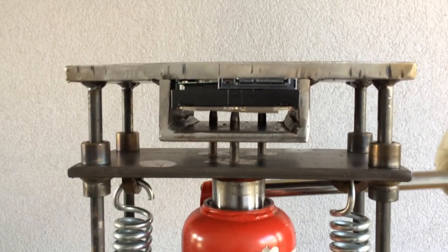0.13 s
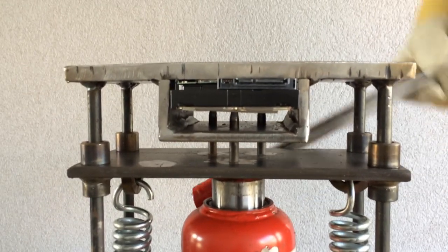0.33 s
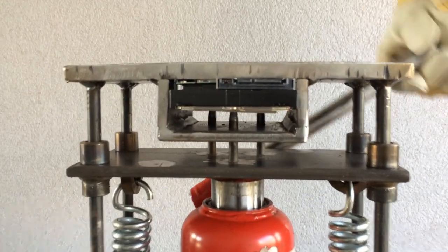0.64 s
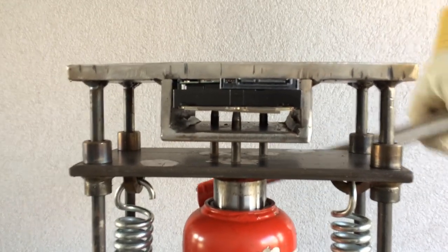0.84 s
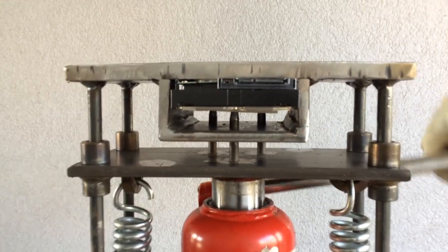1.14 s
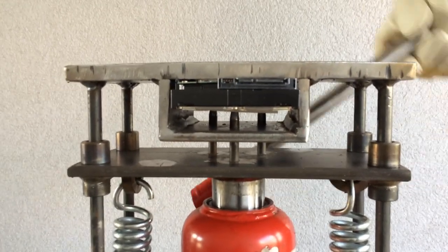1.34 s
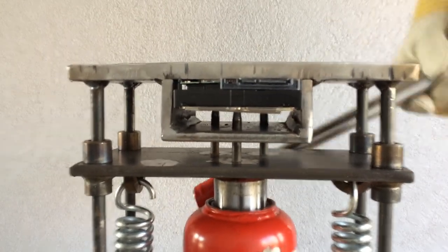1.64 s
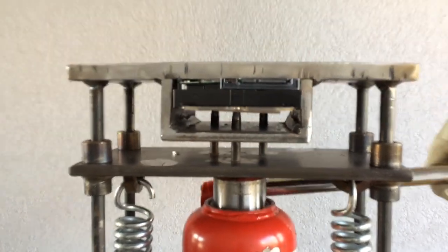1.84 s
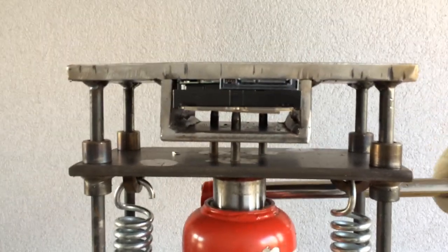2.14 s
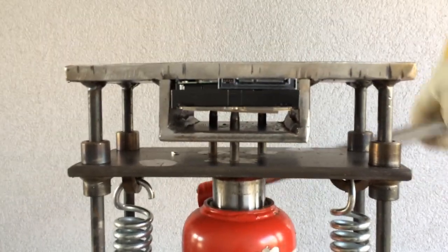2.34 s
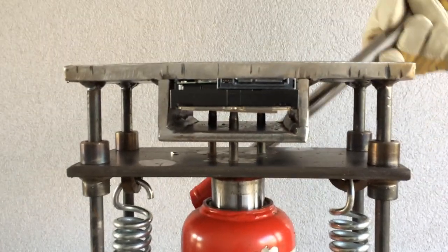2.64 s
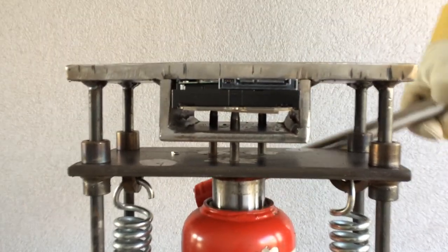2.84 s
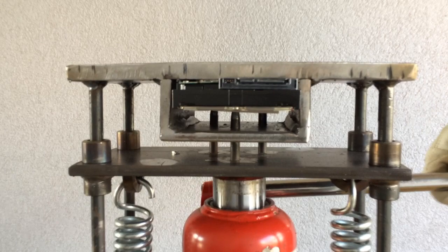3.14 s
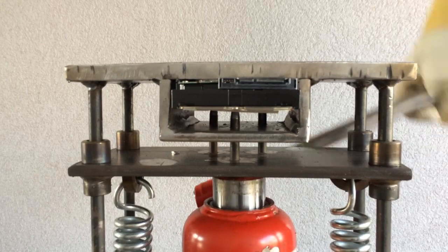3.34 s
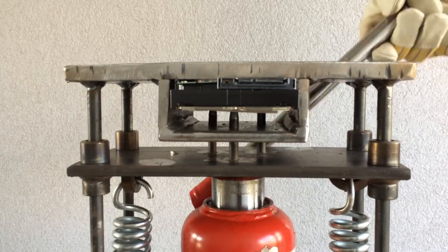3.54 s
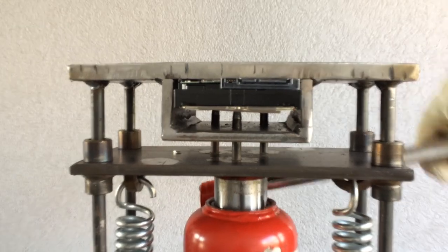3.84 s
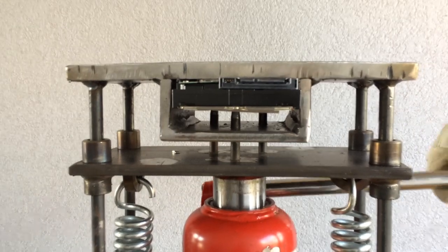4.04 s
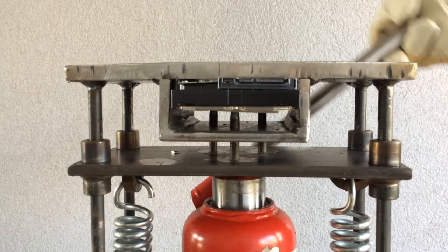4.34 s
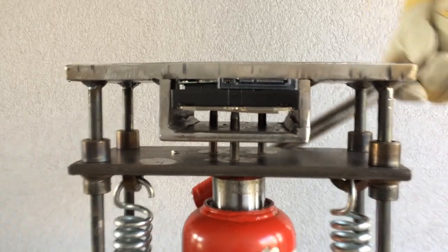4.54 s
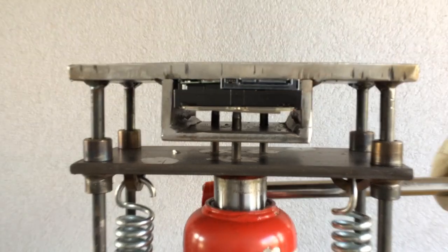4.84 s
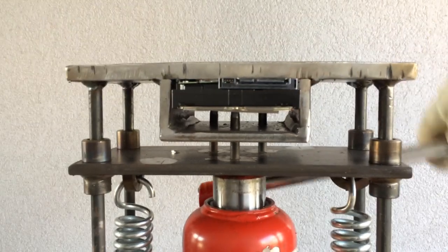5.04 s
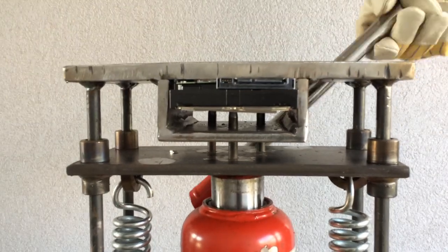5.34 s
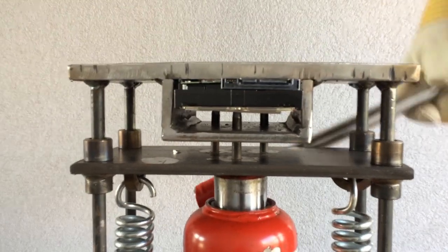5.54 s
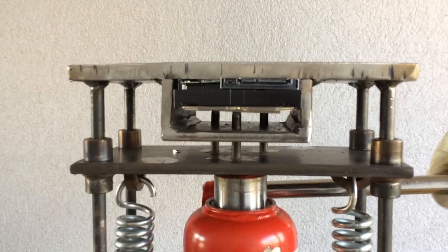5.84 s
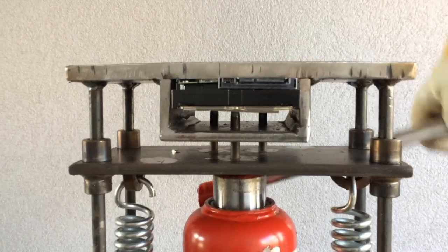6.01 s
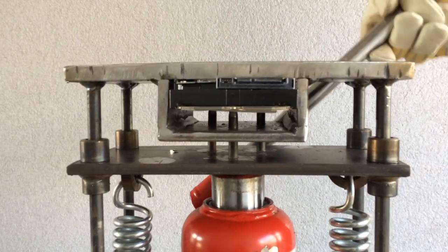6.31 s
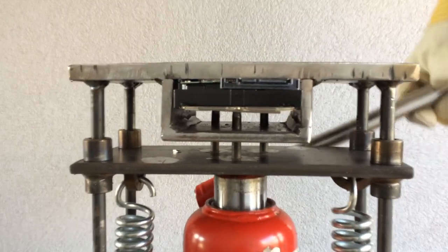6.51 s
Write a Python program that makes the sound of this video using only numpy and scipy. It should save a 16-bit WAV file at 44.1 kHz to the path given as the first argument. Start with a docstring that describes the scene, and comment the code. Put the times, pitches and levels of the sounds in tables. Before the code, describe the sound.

A bottle jack in a steel frame is pumped by hand, heard close up in a bare workshop with short, bright reverberation. Faint room hiss and soft low puffs of moving air run throughout. From 0.1 s dry metallic clicks start, with a light handle knock and a tiny high ping, thickening into a gritty cluster around 0.7 s. Sparser clicks follow at 1.2 s, then a dense group at 1.6 s. At 1.77 s a brief creak leads to a very loud, hard clack, its plates ringing over a noisy tail. Clicking strokes return around 2.4, 2.8, 3.3 and 3.7 s, with faint ticks and soft knocks between. A busy rattle at 4.6 s precedes a second loud clack at 4.93 s, with a stronger low thump and similar ringing. Further click clusters come near 5.5 s, a knock at 5.85 s, and last clicks around 6.5 s.

```python
"""Steel clicks over faint room hiss and low wobbling air: a bottle jack in a press frame is pumped by hand.
The slack pins of the handle linkage make the clicks, as gritty bursts that ring the steel modes.
Faint ticks, knocks on the handle's lower stop and small pin pings join in.
Twice the load slips with a loud clack: a creak, a snap with a rebound, then ringing plates.
The bare workshop answers clicks and clacks with noise tails that die band by band."""
import sys
import numpy as np
from scipy import signal
from scipy.fft import rfft, irfft
from scipy.io import wavfile
from scipy.ndimage import uniform_filter1d

SR = 44100
rng = np.random.default_rng(int(sys.argv[2]) if len(sys.argv) > 2 else 0)


def wav_record(signal):
    """Record a signal, one row per channel, as 16-bit PCM in the file named by sys.argv[1]."""
    frames = np.transpose(np.atleast_2d(signal))
    bounded = np.clip(frames, -1, 1)
    # unit amplitude maps onto the largest positive 16-bit level
    quanta = np.round(bounded * 32767).astype(np.int16)
    wavfile.write(sys.argv[1], SR, quanta)


N = 294147

# contacts of the handle linkage: (time [s], relative level [dB], weight: how far the heavy parts answer [dB],
# hardness: how far the edge bites [dB], decay time constant [ms])
CLICKS = [(0.002, -49.5, 8, 2.5, 0.89), (0.1348, -33, -8, -25, 9), (0.2764, -37, -19, -12, 9.7),
          (0.2844, -33, -24, -5, 11), (0.3081, -30.5, -15.5, -2.5, 4.6), (0.3985, -23.5, -22.5, -11.5, 6.8),
          (0.4982, -40, -41, -17, 5.5), (0.6787, -19.5, -29, -14, 1.8), (0.6827, -29.5, -21, 1, 2.3),
          (0.6937, -20, -21, -13.5, 4.3), (0.7193, -33, -9, 4.5, 5.5), (0.7388, -30.5, -0.5, -26, 8.5),
          (0.757, -39, -16, -24, 5.5), (0.8096, -36, -4.5, -45, 16), (0.9884, -57, -24, 6, 7.7),
          (1.2249, -38.5, -18, -1, 16), (1.2471, -28, -21.5, -3, 4.4), (1.314, -29, -20.5, -4, 4.4),
          (1.4362, -38, -45, -13, 5.8), (1.5878, -22, -14, -18, 7.9), (1.6256, -23, -23, -20, 5.9),
          (1.638, -27.5, -18, -20, 4.2), (1.6422, -24, -24, -19, 4.6), (1.6582, -38, -18, -1, 4.1),
          (1.6646, -29, -23, 2, 3.5), (1.668, -21.5, -20, -11, 4.2), (1.679, -22.5, -15, -10, 4.4),
          (1.6884, -35.5, 6, -15, 8.2), (1.8703, -20, -8.5, -2, 9), (1.8912, -20, -9.5, -8.5, 6.6),
          (2.3612, -34.5, -16, -9.5, 5.5), (2.367, -34, -20, -1, 6.9), (2.3842, -23.5, -20.5, 2.5, 3),
          (2.4087, -19.5, -25, -6, 10.5), (2.5939, -31, -12, -24, 9.4), (2.7617, -22, -33, -26, 4.8),
          (2.7751, -21.5, -23, -8.5, 6.8), (2.7904, -32.5, -22, -4, 7.9), (2.8095, -25.5, -16, -3.5, 9.3),
          (2.8264, -31, -0.5, -26, 6.8), (2.8708, -45, 8, -25, 7.2), (3.0846, -65.5, -9.5, 5.5, 5.5),
          (3.1407, -33.5, -8, -22, 7.2), (3.1804, -54, -5, -2, 5.5), (3.303, -24.5, -21.5, -9, 7.8),
          (3.3098, -35, -14, -3, 4.5), (3.3276, -33, -14.5, -3.5, 15), (3.366, -40, -21, -19, 6.4),
          (3.5378, -41, -19, -20, 5.7), (3.6503, -22.5, -14, -29.5, 5.2), (3.693, -20, -27, -11.5, 8.9),
          (3.7024, -31, -16, 6, 3.7), (3.7251, -32, -10, -12, 5.5), (3.7329, -29, -13, 1.5, 4.3),
          (3.7434, -21, -15.5, -24, 2), (3.7464, -27, -2.5, -18, 3.3), (3.802, -35, 2, -36, 4.2),
          (3.9307, -60, 2.5, -2, 5.5), (3.9604, -55.5, 1.5, -7, 4.8), (4.0446, -41, -4, -24, 9.7),
          (4.1904, -32, -14.5, -27, 6.7), (4.198, -32, -21, -9, 12), (4.2174, -32.5, -18, -2, 7.7),
          (4.225, -32.5, -16, -10, 5.5), (4.2489, -25.5, -26, -10, 10), (4.4079, -42.5, -19.5, -24.5, 5.5),
          (4.579, -21.5, -26, -17.5, 4.9), (4.587, -17, -26, -8.5, 7.8), (4.6082, -28, -23, -10, 4.3),
          (4.6168, -20, -22, -3.5, 3.9), (4.6265, -18.5, -29, -11.5, 6.4), (4.6327, -28.5, -1, -13, 5.8),
          (4.6787, -32.5, -5.5, -31, 10), (4.862, -55, -13, 3, 5.5), (5.1, -33.5, -18, -6, 5),
          (5.1266, -29.5, -19, -1.5, 1.9), (5.3122, -41, 0.5, -27, 4), (5.474, -26, -14, -23, 2.8),
          (5.5196, -19.5, -28, -17, 3.2), (5.525, -24.5, -20.5, -4, 12), (5.5593, -19, -25.5, -10, 6),
          (5.5683, -21, -14.5, -12, 2.4), (5.5777, -31, 2, -15, 5.3), (5.7635, -49.5, -1, -12, 5.5),
          (5.845, -31, -7.5, -18.5, 7.7), (6.0191, -36.5, -17, -12, 7), (6.0274, -36, -16, -0.5, 16),
          (6.056, -34, -13.5, -7, 4.1), (6.111, -40.5, -15.5, -20, 7.9), (6.2734, -42, -18.5, -20, 8),
          (6.4125, -26.5, -13, -35.5, 5.8), (6.4522, -18, -30.5, -9.5, 8.1),
          (6.486, -22.5, -11.5, -13.5, 5.5), (6.5044, -29, 0, -23, 2.6), (6.5557, -35, -4.5, -44, 11)]
# centres of the contact bands: (frequency [Hz])
BAND_HZ = [650, 1450, 3100, 5300, 9500, 15200]
# limits of the directly heard grit in those bands: (low [Hz], high [Hz])
BAND_EDGES_HZ = [(400, 1000), (1000, 2200), (2200, 4200), (4200, 7000), (7000, 14500), (15300, 15800)]
# colour of a contact in each band: (relative level [dB], share of its weight [ratio], share of its hardness [ratio])
CONTACT = [(-5.5, 0.92, 0), (4, 1.035, 0.011), (-9, 0.03, 0.039), (-9.5, 0, 0.12), (-6, 0.14, 1.15),
           (-13, 0.14, 1.3)]
# modes of handle, pins and frame: (frequency [Hz], width [Hz], relative level [dB])
STEEL_MODES = [(688, 120, 1.5), (925, 32, 2), (1168, 70, -1), (1450, 12, -8), (1600, 40, 0.5),
               (1930, 26, -3), (2357, 380, -8), (2550, 90, -15.5), (2920, 130, -4), (3173, 200, 0.5),
               (3320, 9, 1), (3654, 40, -1), (4760, 70, -8), (5080, 49, 1), (5350, 170, -3.5),
               (5820, 49, -9.5), (7625, 440, 0.5), (8390, 260, -2.5), (9180, 130, 0.5), (9800, 110, -2.5),
               (12300, 90, -0.5), (13800, 100, -5), (15520, 130, 8)]
# decay of the workshop: (frequency [Hz], time to fall 60 dB [s])
ROOM_T60 = [(150, 0.63), (300, 0.34), (700, 0.72), (1840, 0.73), (4850, 0.46), (9000, 0.31), (15000, 0.2)]
# colour of the room's answer to the clicks: (frequency [Hz], relative level [dB])
ROOM_COLOUR = [(150, -9.5), (250, -3), (400, 6.5), (700, 5), (1000, 3), (1600, -1), (2500, -0.5), (6000, 0),
               (15000, 1)]
# restless draught on the microphone, rising and falling: (time [s], relative level [dB])
DRAUGHT = [(0.0, -69), (0.76, -48), (1.09, -74.5), (1.99, -57), (3.59, -72), (3.84, -60), (4.66, -72.5),
           (4.83, -54.5), (5.14, -80.5), (5.72, -62), (6.41, -70.5), (6.67, -57)]
# puffs of air on the microphone: (centre time [s], relative level [dB], time to fall 20 dB either side [ms])
PUFFS = [(.024, -52.5, 60), (.30, -45, 82), (.43, -51, 60), (0.564, -39.5, 69), (.696, -46, 47),
         (0.86, -33.5, 42), (0.953, -43, 59), (1.618, -53, 62), (1.745, -45, 43), (1.87, -51, 144),
         (2.07, -45, 81), (2.274, -42, 81.5), (2.452, -43.5, 41.5), (2.68, -49, 73.5), (2.87, -49.5, 68),
         (2.99, -51.5, 84.5), (3.67, -63.5, 60.5), (3.79, -50.5, 122), (4.25, -53, 83.5),
         (4.374, -40, 51.5), (4.67, -44.5, 50.5), (4.89, -60, 85), (5.632, -47, 48), (5.757, -56, 86.5),
         (6.575, -47, 73)]
# spectrum of the air wobble: (frequency [Hz], relative level per Hz [dB])
AIR_TONE = [(15, -44.5), (25, -25), (54, 5), (99, 2), (188, -7), (236, -24), (300, -23.5), (390, -49),
            (660, -120)]
# spectrum of the room hiss: (frequency [Hz], relative level per Hz [dB])
HISS_TONE = [(88, -35), (150, -6.5), (255, -11), (356, 10), (560, -14.5), (682, 6.5), (798, -43),
             (934, -19.5), (2920, -8), (15300, -20.5), (16500, -35)]
# faint ticks under load: (time [s], average rate [ticks per s])
STRAIN = [(0, 40), (.12, 0), (.8, 0), (.9, 30), (1.1, 0), (3.0, 0), (3.1, 30), (3.25, 0), (3.85, 0),
          (3.95, 50), (4.1, 0), (6.67, 0)]
# the handle meets its lower stop: (time [s], relative level [dB])
KNOCKS = [(0.1347, -36), (2.5906, -40), (3.143, -37), (4.044, -46), (5.8475, -31.5)]
# modes of that stop: (frequency [Hz], relative level [dB], time to fall 60 dB [s])
STOP_MODES = [(1373, 1.5, 0.13), (1460, 4.5, 0.053), (1467, -4.5, 0.3), (1555, -9.5, 0.093)]
# a small pin is struck as the handle lifts: (time [s], relative level [dB])
PINGS = [(0.2836, -39.5), (1.2276, -41.5), (2.368, -36.5), (3.312, -44.5), (4.1993, -47), (6.03, -39)]
# modes of that pin: (frequency [Hz], relative level [dB], time to fall 60 dB [s])
PIN_MODES = [(9900, 0.5, 0.12), (12200, -3, .08), (15500, 4, 0.084)]
# the load slips: (time [s], relative level [dB], room level [dB], creak level [dB],
# air push before the bass cut [full scale = 1], bench thump level [dB])
CLACKS = [(1.765, -2.5, -20.5, -44.5, -0.093, -32.5), (4.9267, -4, -21.5, -49.5, 0.13, -15.5)]
# spectrum of the clack's grit: (frequency [Hz], relative level per Hz [dB])
CLACK_TONE = [(88, -49), (150, 2), (478, -8), (681, -14), (1280, -17.5), (1550, -11), (1780, 0.5),
              (2860, -1), (5350, -7), (8920, -7), (15200, -16), (16400, -16)]
# first instant of a clack: (frequency [Hz], relative level [dB], time to fall 60 dB [s])
SNAP_MODES = [(774, -7.5, 0.0082), (1530, -17, 0.013), (2290, 1, .012), (2960, -5.5, 0.0021),
              (4730, -8, .01), (8800, -13.5, .008)]
# thump of the bench: (frequency [Hz], relative level [dB], time to fall 60 dB [s])
BENCH_MODES = [(65, -3.5, 0.056), (141, 2.5, 0.022)]
# long rings of the press plates: (frequency [Hz], relative level [dB], time to fall 60 dB [s])
PLATE_MODES = [(670, -3.5, 1.3), (738, -6.5, 0.71), (918, -15.5, 2.9), (986, -4, 1.5), (1177, -4.5, 0.51),
               (1226, -5, 1.1), (1235, -15.5, 0.68), (1422, -6.5, 2.1), (1580, -11, 1.9), (1500, -4, 1.1),
               (1950, -2.5, .7), (1840, -7.5, 0.36), (2420, -8, .5), (2370, -8.5, .6)]
# colour of the room's answer to a clack: (frequency [Hz], relative level per third octave [dB])
CLACK_TAIL = [(150, -36.5), (300, -25.5), (500, -13.5), (700, -13), (1100, -6.5), (1600, -6.5), (2300, -5),
              (3500, -10), (6000, -10), (10000, -12.5), (15000, -27)]
# the load lands again: (delay [s], spread [s], swell above the tail [dB], upper limit of the swell [Hz])
SETTLE = (.039, .007, 5.5, 4000)

ROOM_STEP = 20  # samples per step of the room's decay
MODE_SHIFT = 9973  # samples between the slow wanderings of neighbouring modes


def amp(db):
    """Turn decibels into gain."""
    return 10 ** (np.asarray(db) / 20)


def rms_one(x):
    """Scale to rms 1."""
    return x / np.sqrt(np.mean(x ** 2) + 1e-20)


def at_hz(points, hz):
    """Read a (frequency, value) table on a log-frequency axis."""
    table_hz, values = np.transpose(points)
    return np.interp(np.log(hz), np.log(table_hz), values)


def coloured(spectrum, count):
    """Noise shaped to the given spectrum; rms 1."""
    hz = np.maximum(np.arange(count // 2 + 1) * SR / count, 1)
    white = rfft(rng.standard_normal(count))
    return rms_one(irfft(white * amp(at_hz(spectrum, hz)), count))


def band(x, low, high, order=2):
    """Butterworth band-pass."""
    return signal.sosfilt(signal.butter(order, [low, high], "band", fs=SR, output="sos"), x)


def lumps(rate_hz):
    """Slow chance: noise through a double low-pass; rms 1."""
    r = np.exp(-2 * np.pi * rate_hz / SR)
    noise = rng.standard_normal(N + SR)
    settled = signal.lfilter([1], [1, -2 * r, r * r], noise)[SR:]
    return rms_one(settled)


def strikes(times, gains):
    """Single-sample blows of the given heights."""
    out = np.full(N, 1e-18)
    np.add.at(out, np.round(np.asarray(times) * SR).astype(int), gains)
    return out


def resonate(x, hz, width_hz):
    """A resonance with gain close to 1 on top."""
    r = np.exp(-np.pi * np.clip(width_hz, 5, 900) / SR)
    feedback = [1, -2 * r * np.cos(2 * np.pi * hz / SR), r * r]
    return signal.lfilter([(1 - r * r) / 2, 0, (r * r - 1) / 2], feedback, x)


def ring(blows, hz, t60):
    """Each unit blow sets a decaying sine of starting height 1 ringing."""
    r = amp(-60 / (max(t60, .005) * SR))
    w = 2 * np.pi * hz / SR
    return signal.lfilter([0, np.sin(w)], [1, -2 * r * np.cos(w), r * r], blows)


def struck(modes, times, db):
    """One body rung by blows of the given levels; neighbouring modes start in opposite directions."""
    blows = strikes(times, amp(db))
    return sum((-1) ** k * amp(mode_db) * ring(blows, hz, t60)
               for k, (hz, mode_db, t60) in enumerate(modes))


def click_db(hz):
    """Level of every contact at one frequency: one colour, bent by its weight and hardness."""
    colour_db, heavy, hard = (np.interp(np.log(hz), np.log(BAND_HZ), column) for column in np.transpose(CONTACT))
    level_db, weight_db, hardness_db = np.array(CLICKS)[:, 1:4].T
    return level_db + colour_db + heavy * weight_db + hard * hardness_db


def bursts(gains):
    """Envelope of all contacts: a sharp spike at the touch, then each one's own decay."""
    out = np.full(N + 4000, 1e-9)
    t = np.arange(4000) / SR
    spike = np.minimum(t / 0.00028, 1) * (1 + 0.38 * np.exp(-t / 0.00043))
    for row, gain in zip(CLICKS, gains):
        at = round(row[0] * SR)
        out[at:at + 4000] += gain * np.exp(-1000 * t / max(row[-1], .3)) * spike
    return out[:N]


def linkage(crack_db, ring_db, grind_db, uneven_db):
    """Each contact is a gritty burst heard directly; its first touch and its grit ring the steel."""
    times = np.array(CLICKS)[:, 0]
    grit = rng.standard_normal((2, N))
    out = np.zeros(N)
    for k, (hz, (low, high)) in enumerate(zip(BAND_HZ, BAND_EDGES_HZ)):
        crack = band(grit[k % 2] * bursts(amp(click_db(hz))), low, high, order=3)
        # make up for the energy lost outside the band
        out += amp(crack_db) * crack * np.sqrt(SR / 2 / max(high - low, 2000))
    # each contact meets every mode differently
    chance = np.clip(rng.standard_normal((len(times), len(STEEL_MODES))), -1.8, 1.3)
    for k, (hz, width_hz, db) in enumerate(STEEL_MODES):
        gains = amp(click_db(hz) + db + uneven_db * chance[:, k])
        touch = amp(ring_db) * strikes(times, gains)
        grind = amp(grind_db) * grit[k % 2] * bursts(gains)
        out += resonate(touch + grind, hz, width_hz)
    return out


def workshop(times, db_at, swell_db=0):
    """Every blow leaves a dense noise tail that dies band by band; tails add as powers."""
    t = np.arange(SR // 20) * ROOM_STEP / SR
    edges = 140 * 2 ** np.arange(0, 7, 1 / 3)  # third octaves [Hz]
    white = rng.standard_normal((2, N))
    out = np.zeros(N)
    for k, (low, high) in enumerate(zip(edges, edges[1:])):
        blow_power = strikes(times, amp(2 * db_at(low)))
        energy = np.add.reduceat(blow_power, np.arange(0, N, ROOM_STEP))
        fall_db = 60 * t / max(at_hz(ROOM_T60, low), .05)
        decay = np.minimum(t / 0.00083, 1) * amp(swell_db * (low < SETTLE[3]) - fall_db)
        power = np.maximum(signal.fftconvolve(energy, decay ** 2)[:len(energy)], 0)
        envelope = np.repeat(np.sqrt(power), ROOM_STEP)[:N]
        out += rms_one(band(white[k % 2], low, high)) * envelope
    return out


def click_tails(wet_db, rattle_db, wander_db):
    """The room's answer to the clicks keeps the shifting colour of the steel; loose parts rattle in it."""
    tail = workshop(np.array(CLICKS)[:, 0], lambda hz: click_db(hz) + at_hz(ROOM_COLOUR, hz) + wet_db)
    tail = tail * amp(rattle_db * lumps(76.0))
    wander = wander_db * lumps(2.2)
    out = tail.copy()
    for k, (hz, width_hz, db) in enumerate(STEEL_MODES):
        gain = amp(db + 3 + np.roll(wander, MODE_SHIFT * k))
        out += (-1) ** k * gain * resonate(tail, hz, width_hz / 2)
    return out


def air(edge_db, restless_db):
    """Moving air wobbles the microphone: a restless draught and single puffs; the stronger reach higher."""
    t = np.arange(N) / SR
    gain = amp(np.interp(t, *np.transpose(DRAUGHT)) + restless_db * lumps(6.0))
    for s, db, fall_ms in PUFFS:
        puff = amp(db - 20 * np.abs(t - s) * 1000 / max(fall_ms, 5))
        gain = np.maximum(gain, puff)
    wobble = coloured(AIR_TONE, count=N)
    wobble /= np.sqrt(uniform_filter1d(wobble ** 2, 1800) + .1)  # even out the size of the wobbles
    edge = rms_one(band(rng.standard_normal(N), 140, 260))
    return gain * (wobble + amp(edge_db) * np.sqrt(gain) * edge)


def hiss(level_db, drift_db):
    """Faint room hiss: coloured noise whose level drifts."""
    return amp(level_db + drift_db * lumps(5.5)) * coloured(HISS_TONE, count=N)


def ticks(level_db, spread_db):
    """Tiny bright ticks at random moments while the press is strained: single samples, band-passed."""
    s, per_s = np.transpose(STRAIN)
    born = rng.random(N) < np.interp(np.arange(N) / SR, s, per_s) / SR
    return band(born * amp(level_db + spread_db * rng.standard_normal(N)), 5800, 16000)


def stop_knocks(level_db):
    """The handle knocks on its lower stop, which rings in a few short modes."""
    return amp(level_db) * struck(STOP_MODES, *np.transpose(KNOCKS))


def pin_pings():
    """A small pin is struck as the handle lifts and rings in high, short modes."""
    return struck(PIN_MODES, *np.transpose(PINGS))


def plates(times, db, waver_db):
    """The plates ring on; loose joints make each mode waver in its own time."""
    blows = strikes(times, amp(db))
    waver = waver_db * lumps(9.8)
    out = np.zeros(N)
    for k, (hz, mode_db, t60) in enumerate(PLATE_MODES):
        gain = amp(mode_db + np.roll(waver, MODE_SHIFT * k))
        out += (-1) ** k * gain * ring(blows, hz, t60)
    return out


def clacks(crack_ms, rebound_s, rebound_db, grit_db, plates_db, waver_db, lead_s):
    """A creak and a slow push of air lead up to a hard snap, grit and a rebound; bench and plates ring."""
    out = np.zeros(N)
    t = np.arange(3000) / SR
    late = np.maximum(t - rebound_s, 0)
    rebound = amp(rebound_db) * (late > 0) * np.exp(-late / 0.0048)
    shape = np.exp(-1000 * t / crack_ms) + rebound
    for s, db, _, creak_db, push, _ in CLACKS:
        at, early = round(s * SR), round((s - lead_s) * SR)
        out[at:at + 3000] += amp(db + grit_db) * shape * coloured(CLACK_TONE, count=3000)
        creak = rms_one(band(rng.standard_normal(at - early), 470, 3800, order=3))
        out[early:at] += amp(creak_db) * creak
        out[early:early + 3000] += push * np.exp(-((t - .014) / .005) ** 2)
    s, db, room_db, _, _, thump_db = np.transpose(CLACKS)
    snap = struck(SNAP_MODES, s, db - 3.5)
    thump = struck(BENCH_MODES, s, thump_db)
    return out + snap + thump + plates(s, room_db + plates_db, waver_db)


def clack_tails(rattle_db):
    """The room's answer to the clacks swells once as the load lands again; loose parts rattle in it."""
    s, _, room_db = np.array(CLACKS)[:, :3].T
    delay, spread, swell_db = SETTLE[:3]
    t = np.arange(SR // 20) * ROOM_STEP / SR
    swell = swell_db * np.exp(-((t - delay) / spread) ** 2)
    tail = workshop(s, lambda hz: room_db + at_hz(CLACK_TAIL, hz), swell)
    return tail * amp(rattle_db * lumps(33.0))


def scene():
    """Clicks, knocks, pings and clacks, near and through the room, over air and hiss."""
    out = linkage(crack_db=-4.0, ring_db=29.5, grind_db=6.5, uneven_db=7.5)
    out += click_tails(wet_db=-23.0, rattle_db=1.5, wander_db=4)
    out += air(edge_db=6.5, restless_db=1.0)
    out += hiss(level_db=-68.5, drift_db=2.7)
    out += ticks(level_db=-41.5, spread_db=3.5)
    out += stop_knocks(level_db=-6.0)
    out += pin_pings()
    out += clacks(crack_ms=3.2, rebound_s=.006, rebound_db=-12.0, grit_db=-7.0,
                  plates_db=-16.5, waver_db=2.2, lead_s=0.024)
    out += clack_tails(rattle_db=2.0)
    return out[None]


def record(dry):
    """The microphone drops the deepest bass, the loudest peaks are rounded, the top is cut steeply."""
    ceiling, cutoff_hz = .85, 17000  # ceiling with full scale = 1
    dry = signal.sosfilt(signal.butter(3, 44.0, "high", fs=SR, output="sos"), dry)
    dry = ceiling * np.tanh(dry / ceiling)
    return signal.sosfilt(signal.cheby2(10, 60, cutoff_hz, fs=SR, output="sos"), dry)


dry = scene()
out = record(dry)
wav_record(out)
```